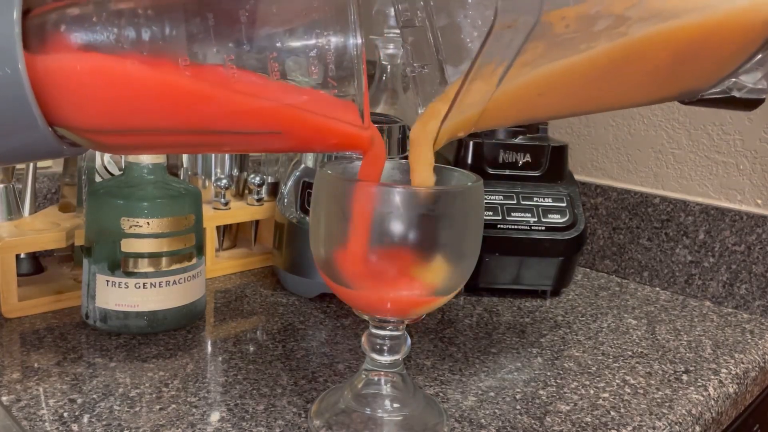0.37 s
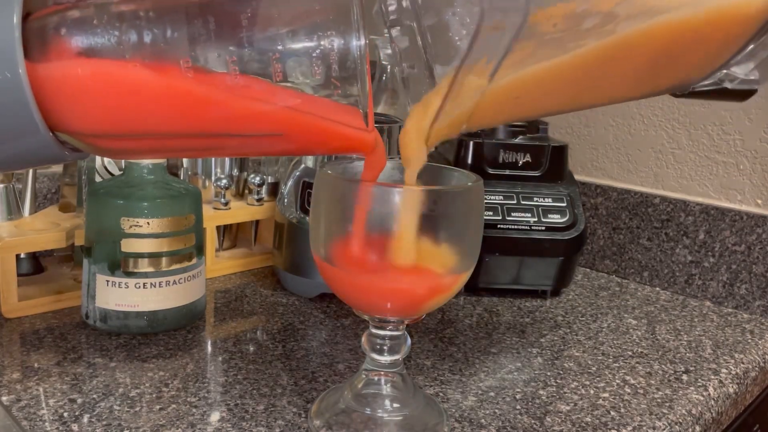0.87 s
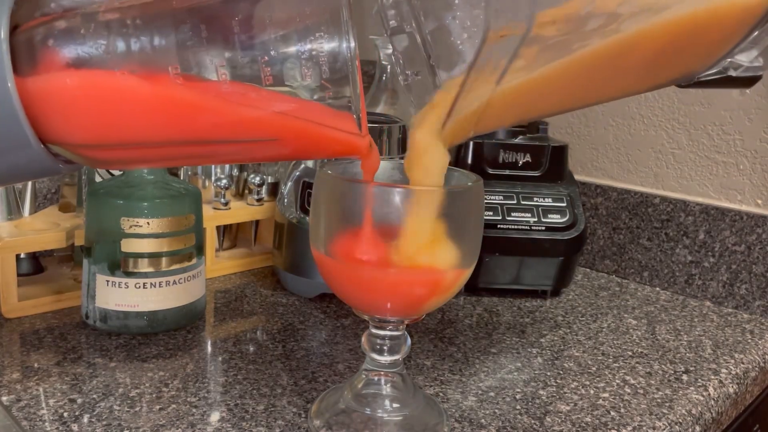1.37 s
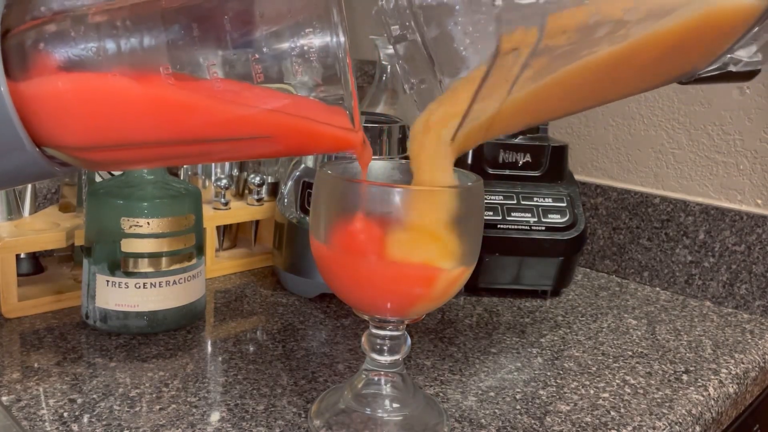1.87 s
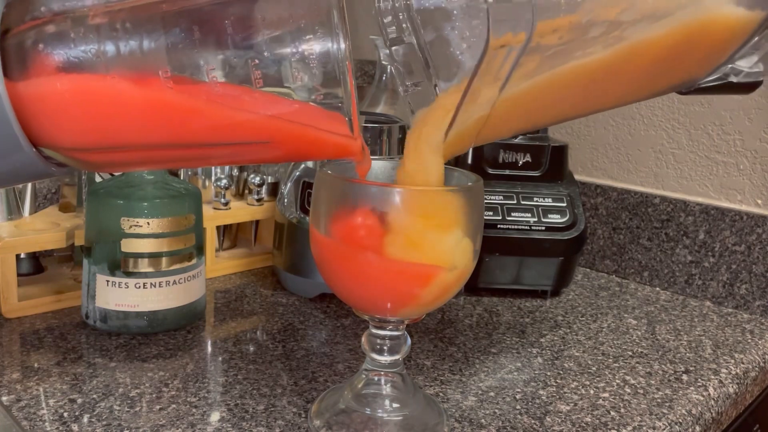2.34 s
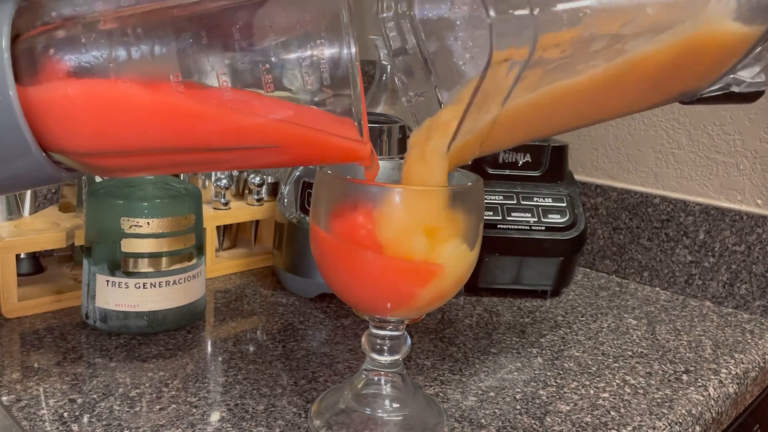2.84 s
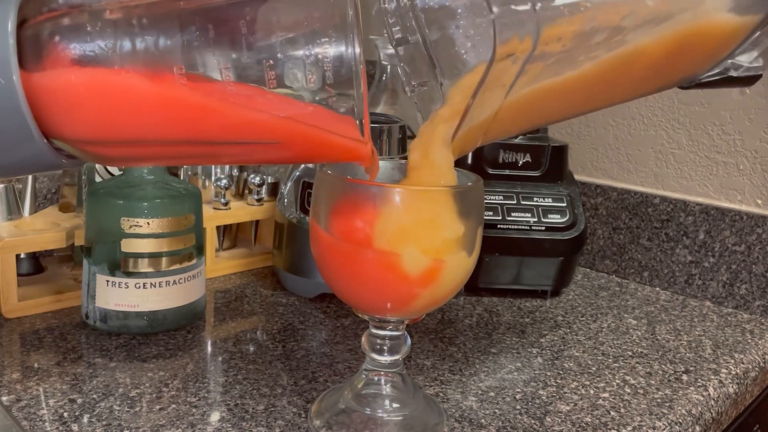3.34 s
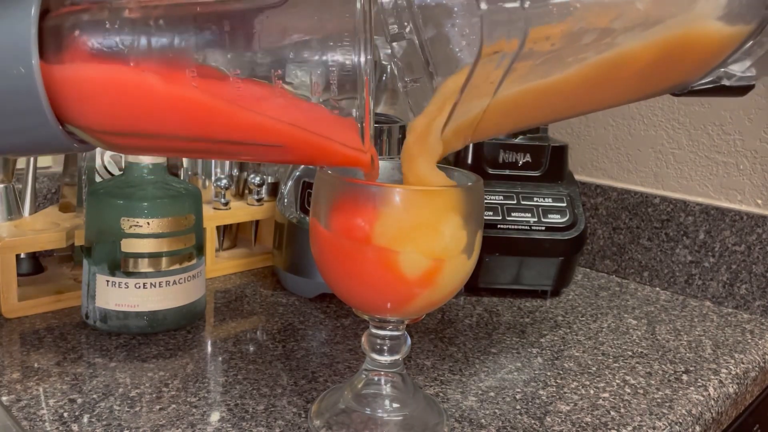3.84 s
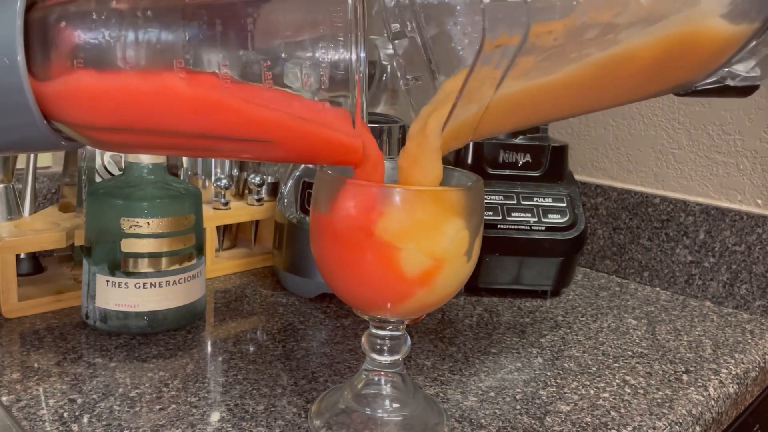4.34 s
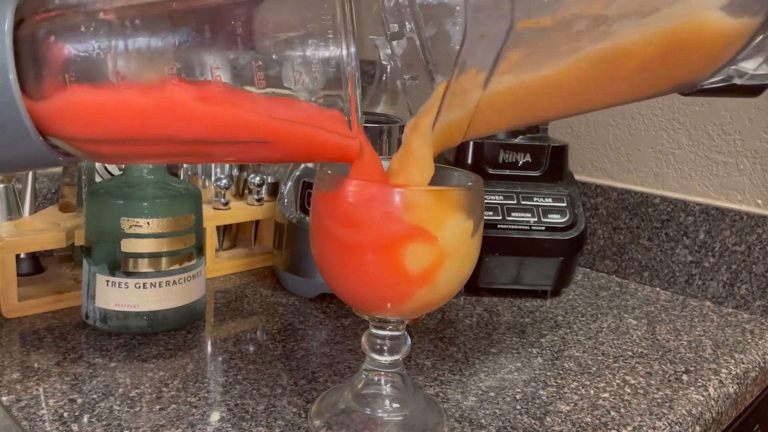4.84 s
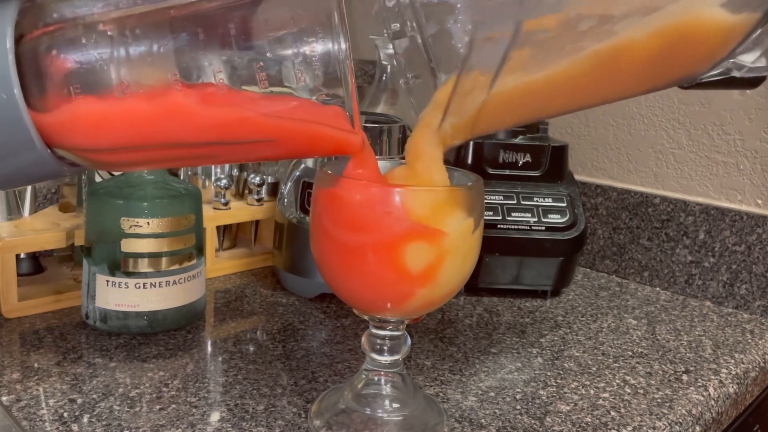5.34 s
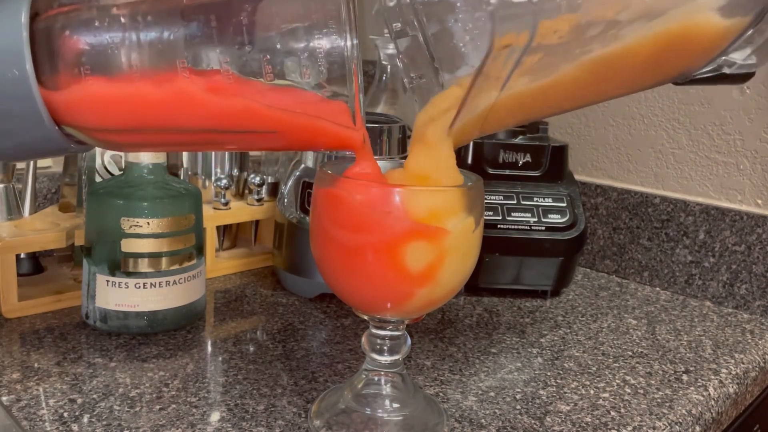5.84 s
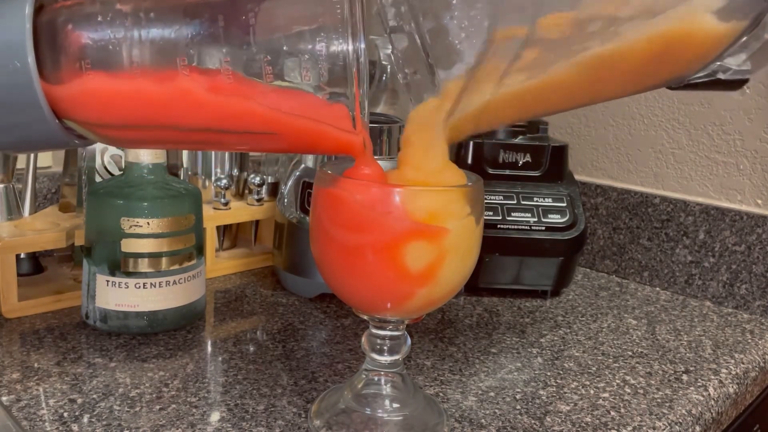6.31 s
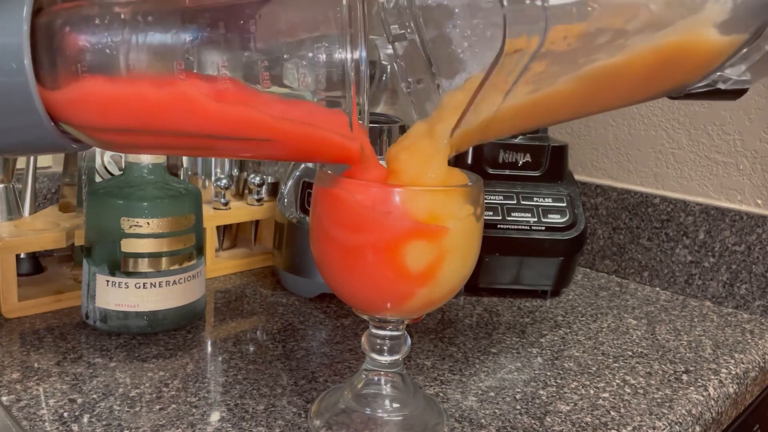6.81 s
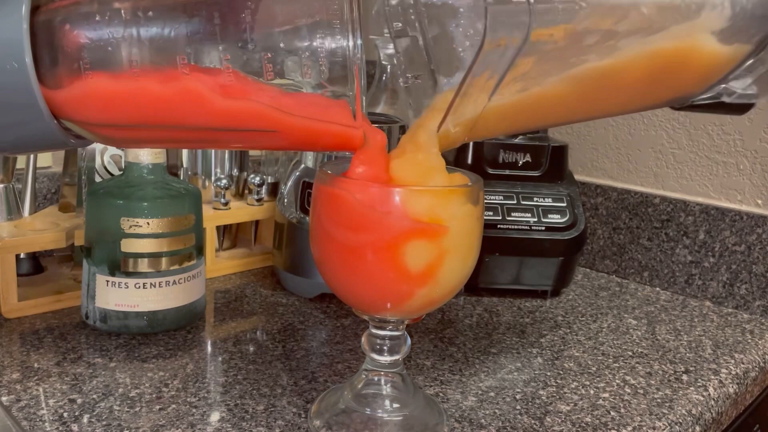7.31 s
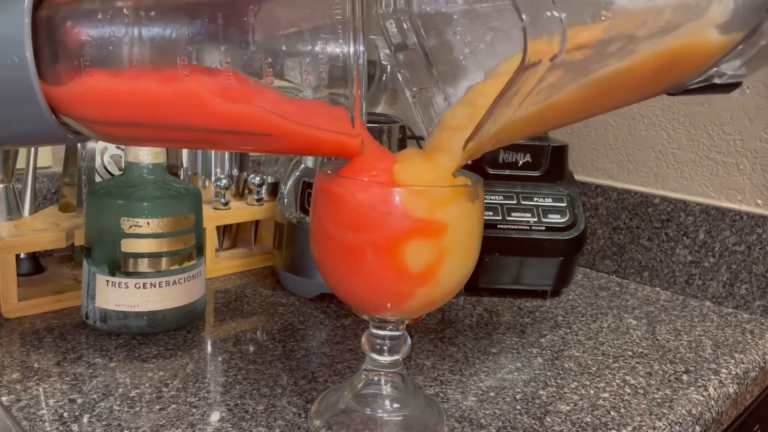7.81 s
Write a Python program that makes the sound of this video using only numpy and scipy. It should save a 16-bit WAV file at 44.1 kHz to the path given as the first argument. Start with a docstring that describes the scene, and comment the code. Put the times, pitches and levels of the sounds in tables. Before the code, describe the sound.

Low kitchen appliance hum with small claw-like ticks on a hard floor, distant then close and quick, and a few hollow jar knocks on thick glass.

```python
"""Kitchen: frozen slush slides from two plastic jars into a thick glass, as hissing noise and random grains.
Jars knock on the rim as decaying modes; drops of melt ring as rising sines.
Small hard ticks, like claws on a hard floor, excite resonances, far off at first and then close by.
An appliance hums as narrow-band noise over coloured air noise; decaying noise makes the echo.
Two microphone ports hear the room with different levels and phases."""
import sys
import numpy as np
from scipy import signal
from scipy.fft import rfft, irfft, next_fast_len
from scipy.io import wavfile

SR = 44100
rng = np.random.default_rng(int(sys.argv[2]) if len(sys.argv) > 2 else 0)


def bounce(signal):
    """Save signal as a 16-bit WAV file at the path given by the first command-line argument."""
    frames = np.transpose(np.atleast_2d(signal))
    limited = np.clip(frames, -1, 1)
    pcm = np.round(limited * 32767).astype(np.int16)
    wavfile.write(sys.argv[1], SR, pcm)


def voltage_ratio(level):
    """Linear amplitude factor for a level in decibels (scalar or array-like)."""
    return 10 ** (np.asarray(level, float) / 20)


N = 360738

# Air and appliances of the kitchen. Each row: frequency in Hz, relative density in dB per Hz.
AIR_SPECTRUM = [(22, -22), (35, -19.5), (50, -6.5), (63, -7.5), (80, 2), (105, -4), (170, -8), (260, -8),
                (400, -13), (700, -20), (1100, -26.5), (1800, -35), (3400, -41.5), (5000, -53.5),
                (9000, -57), (16000, -59)]
AIR_RMS_DB = -47.5
# Hum resonances. Each row: frequency in Hz, width of one filter pass in Hz, rms level in dB.
HUM_TONES = [(258.6, 11.5, -59), (299.4, 3.24, -62.5), (351.2, 17, -72), (633.2, 10, -69.5),
             (3440, 49, -83)]
# Drift of the lowest hum tone. Each row: time in seconds, rms level in dB.
LOW_HUM_DRIFT = [(0.0, -44), (0.48, -49), (1.05, -46), (1.96, -52.5), (2.28, -48), (4.6, -45.5), (5.1, -50),
                 (6.97, -44.5), (7.68, -51), (8.18, -47.5)]
LOW_HUM_HZ, LOW_HUM_WIDTH_HZ = 130.3, 14.4
# Left-right likeness of diffuse sound. Each row: frequency in Hz, likeness from 0 to 1.
STEREO_LIKENESS = [(60, .94), (170, .9), (350, .75), (700, .1), (1400, .2), (2100, .63), (4100, .84),
                   (5400, .85), (5700, .99), (6300, .97), (6800, .8), (7400, .85), (7750, 1), (8750, 1),
                   (9200, .8), (10200, .8), (10700, 1), (12500, 1), (13000, .75), (13600, .8), (13950, 1),
                   (16000, 1)]

# Kitchen echo. Each row: frequency in Hz, t60 in seconds, relative level in dB.
KITCHEN_ECHO = [(195, 0.63, -23), (463, 0.43, -13.5), (1510, 0.35, -9.5), (4000, 0.35, -18),
                (7540, 0.35, -11), (15200, 0.083, -15.5)]
ECHO_MIN_LIKENESS, ECHO_OFFSET_DB, KNOCK_ECHO_DB = 0.17, -16, -7.5

# Hard ticks. Each row: start in seconds, relative level in dB, treble against that level in dB
# (body and treble gains are added later).
TICK_EVENTS = [(0.1885, -55, -24), (0.2302, -36.5, -27), (0.2758, -40.5, -27), (0.3433, -47.5, -42),
               (0.3964, -50, -22), (0.4605, -39.5, -42), (0.523, -43.5, -24), (0.7338, -49, -24),
               (0.7956, -43.5, -24), (0.9373, -51.5, -22), (0.9859, -41.5, -32), (1.1306, -40.5, -22),
               (1.1943, -48, -27), (1.6235, -38.5, -25), (1.68, -42.5, -29), (1.759, -46, -24),
               (1.917, -39, -29), (1.9599, -45, -21), (2.019, -52.5, -12), (2.2498, -36.5, -22),
               (2.302, -39.5, -38), (2.4719, -33.5, -16.5), (2.78, -47.5, -30), (2.819, -42.5, -25),
               (3.0664, -51.5, -25), (3.1513, -56, -20), (3.244, -49, -34), (3.333, -42, -43),
               (3.411, -52, -33), (3.8696, -44, -45), (4.2736, -39.5, -48), (4.339, -42.5, -41),
               (4.4267, -48, -30), (4.4723, -42.5, -6.5), (4.9218, -44, -27), (5.0399, -26.5, -17),
               (5.05, -26.5, -13.5), (5.108, -30.5, -17.5), (5.2778, -44, -38), (5.3019, -29, -13),
               (5.3564, -31.5, -13), (5.4932, -31.5, -21), (5.561, -30, -26), (5.5736, -29, -12),
               (5.5787, -31, -4.5), (5.6247, -30, -20), (5.861, -49, -39), (6.0022, -33, -30),
               (6.074, -30, -19.5), (6.1785, -30, -15.5), (6.1953, -36, -11), (6.253, -32, -18.5),
               (6.3651, -30, -20.5), (6.4358, -30.5, -21.5), (6.5431, -31.5, -19), (6.638, -30, -17.5),
               (6.748, -32, -23), (6.8004, -46, -34), (6.8271, -31.5, -19), (6.9168, -31, -19),
               (6.992, -30.5, -19), (7.0935, -30, -15.5), (7.1805, -30, -19.5), (7.295, -31.5, -16),
               (7.3886, -30, -16), (7.493, -32, -16), (7.5188, -34.5, -24), (7.5866, -30.5, -17.5),
               (7.6965, -32.5, -19), (7.7847, -32.5, -20), (7.876, -31.5, -19), (7.9642, -35, -22),
               (8.064, -31, -25), (8.133, -35, -25)]
# Resonances of a tick. Each row: frequency in Hz, width in Hz, relative level in dB.
TICK_RESONANCES = [(1176, 450, -7), (1635, 97, 0), (2270, 380, -4.5), (2850, 690, -4), (3760, 126, -0.5),
                   (3923, 44, 4.5), (4220, 430, -2), (5510, 280, -4.5), (6060, 67, -12.5),
                   (7480, 200, -8.5)]
TICK_BODY_GAIN_DB, TICK_TREBLE_GAIN_DB = 15.5, 18
RATTLE_DECAY_S, RATTLE_DB = 0.018, -29   # decay to 1/e
SCRATCH_DECAY_S, SCRATCH_DB, SCRATCH_LIKENESS, SCRATCH_TOP_HZ = 0.0018, -4, 0.82, 10500
PING_HZ, PING_WIDTH_HZ, PING_DB = 3330, 110, 10.5
NEAR_TICK_DB, PING_FADE_DB_PER_DB = -33, 0.6   # ping loses extra level below NEAR_TICK_DB

# Drops of melt in the glass. Each row: start in seconds, peak level in dB, starting pitch in Hz.
MELT_DROPS = [(0.7582, -52, 3420), (1.694, -48, 2740), (2.75, -52, 1660)]
DROP_T60_CYCLES = 39   # in cycles of the starting pitch
DROP_CHIRP_PER_S = 2.8   # phase factor; pitch rises by twice this share per second

# Jar on glass. Each row: start in seconds, crack in dB, thud against crack in dB,
# hollowness within the thud in dB, hard edge against crack in dB (all relative, gains are added later).
KNOCK_EVENTS = [(2.9411, -42.5, 13, 4, -44), (3.6836, -26, 7.5, 8, -38), (3.7513, -31.5, 9, 5.5, -48),
                (3.9941, -45.5, 13.5, 3, -45), (4.6364, -23.5, 9, 3.5, -8.5), (5.5882, -50.5, 16, -2, -3),
                (8.0774, -24, 22, -1, 5)]
# Modes of jar and glass. Each row: frequency in Hz, relative level in dB, undamped t60 in seconds.
JAR_MODES = [(113, -18.5, 0.094), (277, 2.5, 0.015), (359, 3.5, 0.055), (412, -2, 0.042),
             (460, -2.5, 0.082), (509, -14.5, 0.083), (572.5, -13.5, 0.11), (662, -10.5, 0.033),
             (826, -21, 0.08), (983, -5, 0.034), (1244, -5.5, 0.05), (1352, 0.5, 0.024), (1480, 2, 0.024),
             (1660, -13, 0.065), (1770, 10.5, 0.0075), (2093, 2, 0.016), (2350, 3, 0.018),
             (2940, 5.5, 0.013), (3160, -10, 0.063), (3200, -7.5, 0.019), (3654, -10, 0.097),
             (3780, -33, 0.012), (5070, -11, 0.033), (6090, -16, 0.036)]
SLUSH_T60_SHARE = 0.82   # slush damps every ring to this share of its length
CRACK_FROM_HZ, HOLLOW_FROM_HZ, UNEVEN_FROM_HZ, SKEW_RAD = 900, 545, 440, 0.43
THUD_GAIN_DB, CRACK_GAIN_DB = -1.5, -0.5
PUSH_S, PUSH_LAG_S, SNAP_S = 0.0018, 0.00198, 0.00059
# A crack under HARD_CRACK_DB is duller.
HARD_CRACK_DB, SOFTENING_DB_PER_OCTAVE_PER_DB, SOFT_FROM_HZ = -22, 1.7, 1500
JUDDER_GAIN_DB, JUDDER_BAND_HZ, JUDDER_DECAY_S = -2.5, [800, 4320], 0.0025
EDGE_FROM_HZ, EDGE_RING_GAIN_DB, EDGE_NOISE_GAIN_DB = 4200, 7, -4

# Slush over the spouts. Each row: time in seconds, hiss rms level in dB.
SLIDE_FLOW = [(0.0, -76.5), (1.09, -72), (1.91, -69.5), (2.05, -75), (3.51, -84.5), (4.28, -80),
              (4.49, -78), (4.97, -89), (5.51, -74), (5.76, -79.5), (6.01, -84), (6.2, -81), (7.63, -82),
              (7.91, -76), (8.09, -76), (8.18, -71)]
# Hiss colour. Each row: frequency in Hz, relative density in dB per Hz.
SLIDE_SPECTRUM = [(1500, -38), (3500, -12.5), (5200, -11.5), (7000, -6.5), (9500, -3.5), (11500, -13.5),
                  (14000, -4.5), (16000, -25)]
GRAINS_PER_S, GRAIN_SPREAD_DB, GRAIN_DB = 250, 4, -10   # grain rms counts from the hiss

# Port balance. Each row: frequency in Hz, left over right in dB.
PORT_LEVELS = [(30, .6), (60, 1.5), (150, 3.5), (600, .8), (1700, 1.2), (2800, 4.5), (5100, 4.2),
               (5700, .5), (7700, 0), (16000, 0)]
# Port phase. Each row: frequency in Hz, lead of the right port in half turns.
RIGHT_PORT_LEAD = [(30, 0), (2000, 0), (2700, -.2), (3700, -.1), (5200, -.2), (5650, 0), (6200, .03),
                   (7750, 1), (8750, 1), (10700, 2), (12500, 2), (13950, 3), (16000, 3)]
# Microphone response. Each row: frequency in Hz, gain in dB.
MIC_RESPONSE = [(30, 2), (12000, 1), (13500, -6.5), (15000, -1), (16500, -29)]


def rms_one(x):
    """Scale to unit rms."""
    return x / np.sqrt(np.mean(x ** 2) + 1e-20)


def at_hz(points, hz, column=1):
    """Read one column of a table on a log-frequency axis."""
    points = np.array(points)
    return np.interp(np.log(hz), np.log(points[:, 0]), points[:, column])


def at_time(points):
    """Read a table of (s, dB) at every sample, as amplitude."""
    s, level_db = np.transpose(points)
    return voltage_ratio(np.interp(np.arange(N) / SR, s, level_db))


def resonance(x, hz, width_hz):
    """Two-pole resonance with gain 1 on top."""
    r = np.exp(-np.pi * width_hz / SR)
    numerator = (1 - r * r) / 2 * np.array([1, 0, -1])
    return signal.lfilter(numerator, [1, -2 * r * np.cos(2 * np.pi * hz / SR), r * r], x)


def butter_filter(x, order, hz, kind):
    """Butterworth filter, run forward."""
    return signal.sosfilt(signal.butter(order, hz, kind, fs=SR, output="sos"), x)


def pair(mid, side, alike):
    """Left and right from a shared and an opposed part."""
    alike = np.clip(alike, 0, 1)
    shared = np.sqrt(1 + alike) * mid
    opposed = np.sqrt(1 - alike) * side * np.array([[1], [-1]])
    return (shared + opposed) / np.sqrt(2)


def coloured_noise(spectrum):
    """Stereo noise of a given spectrum and likeness; rms 1."""
    size = next_fast_len(N)
    hz = np.maximum(np.arange(size // 2 + 1) * SR / size, 1)
    mid, side = rfft(rng.standard_normal((2, size)))
    in_band = (hz > 0.8 * spectrum[0][0]) & (hz < spectrum[-1][0])
    shaped = pair(mid, side, at_hz(STEREO_LIKENESS, hz)) * voltage_ratio(at_hz(spectrum, hz)) * in_band
    return rms_one(irfft(shaped, size)[:, :N])


def wavering_tone(hz, width_hz):
    """Noise twice through one resonance wavers in strength and phase; rms 1."""
    noise = rng.standard_normal((2, N + SR))
    mid, side = resonance(resonance(noise, hz, width_hz), hz, width_hz)[:, SR:]   # skip the run-in
    return rms_one(pair(mid, side, at_hz(STEREO_LIKENESS, hz)))


def air():
    """Broadband kitchen and appliance noise of fixed colour."""
    return voltage_ratio(AIR_RMS_DB) * coloured_noise(AIR_SPECTRUM)


def hum():
    """Motor and room resonances waver by chance; the lowest also drifts slowly."""
    low = at_time(LOW_HUM_DRIFT) * wavering_tone(LOW_HUM_HZ, LOW_HUM_WIDTH_HZ)
    return low + sum(voltage_ratio(rms_db) * wavering_tone(hz, width_hz) for hz, width_hz, rms_db in HUM_TONES)


def kitchen(x):
    """Dense echo: convolution with noise that dies band by band."""
    t, edges_hz, echo = np.arange(SR // 2) / SR, 140 * 2 ** np.arange(0, 7.1, 0.5), 0
    white = rng.standard_normal((2, 2, len(t)))
    for k, (low, high) in enumerate(zip(edges_hz, edges_hz[1:])):
        band = butter_filter(white[k % 2], 2, [low, high], "band")
        hz = np.sqrt(low * high)
        level_db = at_hz(KITCHEN_ECHO, hz, column=2) + ECHO_OFFSET_DB
        echo = echo + band * voltage_ratio(level_db - 60 * t / at_hz(KITCHEN_ECHO, hz))
    hz = np.maximum(np.arange(len(t) + 1) * SR / (2 * len(t)), 1)
    alike = np.maximum(at_hz(STEREO_LIKENESS, hz), ECHO_MIN_LIKENESS)
    onset = np.clip(t / 0.00033, 0, 1)
    echo = irfft(pair(*rfft(echo * onset, 2 * len(t)), alike))
    return signal.fftconvolve(echo[:, :len(t)], x[None])[:, :N]


def ticks():
    """A sharp contact rings body resonances; rattle, scratch and ping are returned apart as direct sound."""
    s, level_db, treble_db = np.transpose(TICK_EVENTS)
    at, length = np.round(s * SR).astype(int), 600
    body, bright = np.zeros((2, N)) + 1e-18
    body[at] = voltage_ratio(level_db + TICK_BODY_GAIN_DB)
    bright[at] = voltage_ratio(level_db + treble_db + TICK_TREBLE_GAIN_DB)
    contact = resonance(bright, 4900, 9200)
    for k, (hz, width_hz, db) in enumerate(TICK_RESONANCES):
        contact = contact + (-1) ** k * voltage_ratio(db) * resonance(body, hz, width_hz)

    # One rattle burst and two scratch bursts (mid, side) for each tick.
    decay_s = [[RATTLE_DECAY_S], [SCRATCH_DECAY_S], [SCRATCH_DECAY_S]]
    bursts = rng.standard_normal((len(TICK_EVENTS), 3, length)) * np.exp(-np.arange(length) / SR / decay_s)
    near = np.zeros((3, N + length)) + 1e-18
    for i, burst in zip(at, bursts):
        near[:, i:i + length] += burst * [[body[i]], [bright[i]], [bright[i]]]
    rattle = voltage_ratio(RATTLE_DB) * resonance(near[0], 2200, 1950)
    scratch = voltage_ratio(SCRATCH_DB) * pair(*resonance(near[1:], 7200, 5400), SCRATCH_LIKENESS)
    scratch = butter_filter(scratch, 2, SCRATCH_TOP_HZ, "low")

    pinged = np.zeros(N) + 1e-18
    distance_db = PING_FADE_DB_PER_DB * np.minimum(level_db - NEAR_TICK_DB, 0)
    pinged[at] = body[at] * voltage_ratio(PING_DB + distance_db)
    return contact, (rattle + scratch)[:, :N] + resonance(pinged, PING_HZ, PING_WIDTH_HZ)


def drops():
    """A small bubble rings briefly and rises in pitch."""
    t, out = np.arange(SR // 10) / SR, np.zeros(N)
    for s, level_db, hz in MELT_DROPS:
        i = round(s * SR)
        decay = voltage_ratio(level_db - 60 * t * hz / DROP_T60_CYCLES)
        out[i:i + len(t)] += decay * np.sin(2 * np.pi * hz * t * (1 + DROP_CHIRP_PER_S * t))
    return out


def knocks():
    """The hard edge cracks the high modes at once and judders; the soft push behind it swells the low modes."""
    t, out = np.arange(SR // 4) / SR, np.zeros((2, N + SR))
    hz, mode_db, t60_s = np.transpose(JAR_MODES)[:, :, None]
    low = hz < CRACK_FROM_HZ
    since = np.maximum(t - PUSH_LAG_S * low, 0)
    snap = 1 - np.exp(-t / SNAP_S)
    swell = np.where(low, 1 - np.exp(-(since / PUSH_S) ** 2), snap)
    decay = voltage_ratio(-60 * since / (t60_s * SLUSH_T60_SHARE))
    phase = 2 * np.pi * hz * since
    # Upper modes radiate unevenly: opposite phase shifts on the two sides.
    skew = SKEW_RAD * (hz > UNEVEN_FROM_HZ) * (-1) ** np.arange(len(JAR_MODES))[:, None]
    octaves_up = np.maximum(np.log2(hz / SOFT_FROM_HZ), 0)
    spread_db = rng.normal(0, 1.5, (len(KNOCK_EVENTS), len(JAR_MODES), 1))
    shakes = rng.standard_normal((len(KNOCK_EVENTS), 2, len(t))) * np.exp(-t / JUDDER_DECAY_S) * snap
    for (s, crack_db, thud_db, hollow_db, edge_db), chance_db, shake in zip(KNOCK_EVENTS, spread_db, shakes):
        soft_db = SOFTENING_DB_PER_OCTAVE_PER_DB * min(crack_db - HARD_CRACK_DB, 0)
        push_db = THUD_GAIN_DB + thud_db + hollow_db * (hz > HOLLOW_FROM_HZ)
        edge_ring_db = (edge_db + EDGE_RING_GAIN_DB) * (hz > EDGE_FROM_HZ)
        snap_db = CRACK_GAIN_DB + soft_db * octaves_up + edge_ring_db
        level_db = crack_db + mode_db + np.where(low, push_db, snap_db) + chance_db
        size = voltage_ratio(level_db) * swell * decay
        rings = [(size * np.sin(phase + side * skew)).sum(axis=0) for side in (1, -1)]
        judder = voltage_ratio(JUDDER_GAIN_DB + soft_db) * butter_filter(shake[0], 4, JUDDER_BAND_HZ, "band")
        edge = voltage_ratio(edge_db + EDGE_NOISE_GAIN_DB) * resonance(shake[1], 4900, 4600)
        i = round(s * SR)
        out[:, i:i + len(t)] += rings + voltage_ratio(crack_db) * (judder + edge)
    return out[:, :N]


def slide():
    """Wet ice hisses over the spouts with single grains crackling in it; both swell with the flow."""
    sizes = voltage_ratio(GRAIN_SPREAD_DB * np.minimum(rng.exponential(1, N), 4)) * rng.choice([-1, 1], N)
    impacts = sizes * (rng.random(N) < GRAINS_PER_S / SR) + 1e-18
    grains = rms_one(resonance(impacts, 3800, 2500))
    return at_time(SLIDE_FLOW) * (coloured_noise(SLIDE_SPECTRUM) + voltage_ratio(GRAIN_DB) * grains)


def scene():
    """Contacts ring in the kitchen over hum, air and hiss."""
    contact, near = ticks()
    at_glass = knocks() + drops()
    echo = kitchen(contact + voltage_ratio(KNOCK_ECHO_DB) * at_glass.mean(axis=0))
    return air() + hum() + echo + contact + near + at_glass + slide()


def low_pass(x):
    """Removes everything above the highest recorded frequency."""
    return signal.sosfilt(signal.butter(12, 15900, fs=SR, output="sos"), x)


def record(dry):
    """The ports differ in level and phase by frequency; the microphone's top rolls off."""
    size = next_fast_len(N + 2048)
    hz = np.maximum(np.arange(size // 2 + 1) * SR / size, 1)
    # Half of the difference goes to each port.
    left = voltage_ratio(at_hz(PORT_LEVELS, hz) / 2) * np.exp(-0.5j * np.pi * at_hz(RIGHT_PORT_LEAD, hz))
    ports = np.array([left, 1 / left])
    ported = irfft(rfft(dry, size) * voltage_ratio(at_hz(MIC_RESPONSE, hz)) * ports, size)[:, :N]
    return low_pass(ported)


dry = scene()
out = record(dry)
bounce(out)
```